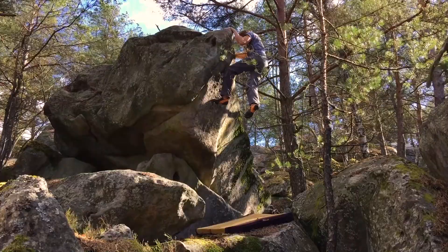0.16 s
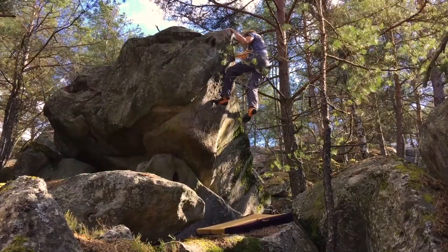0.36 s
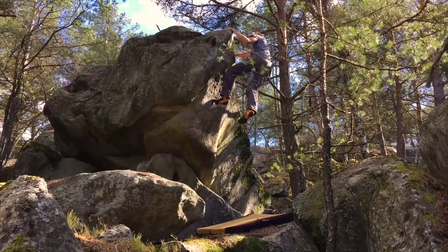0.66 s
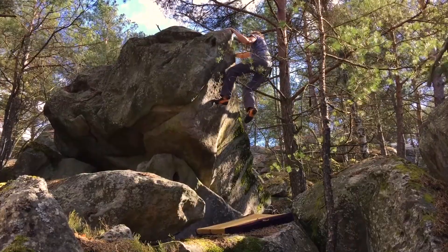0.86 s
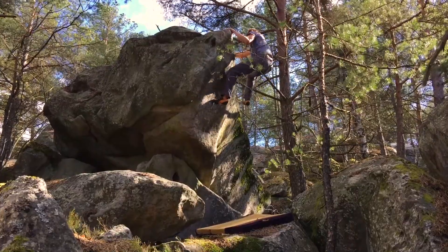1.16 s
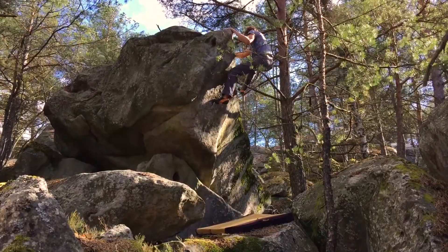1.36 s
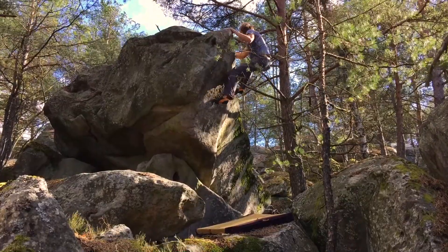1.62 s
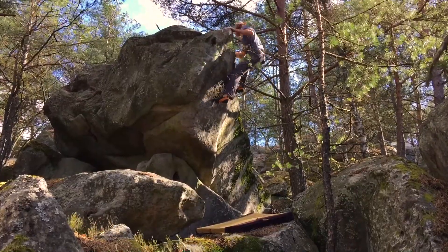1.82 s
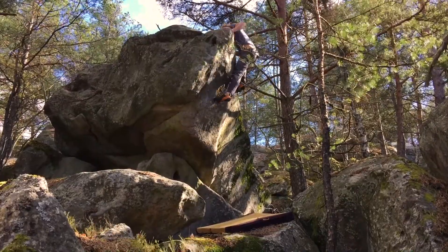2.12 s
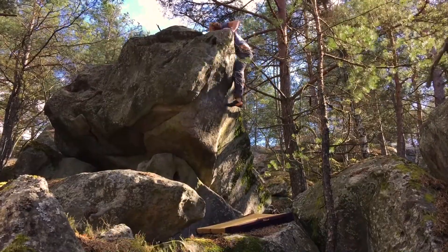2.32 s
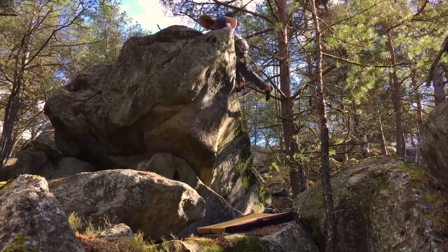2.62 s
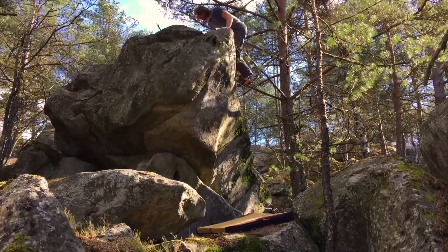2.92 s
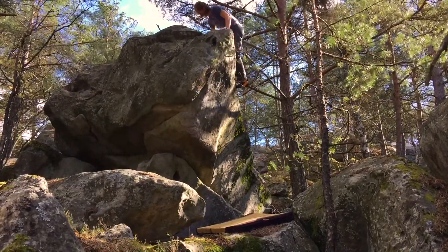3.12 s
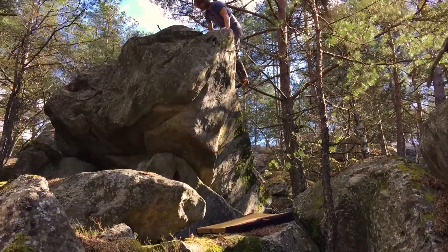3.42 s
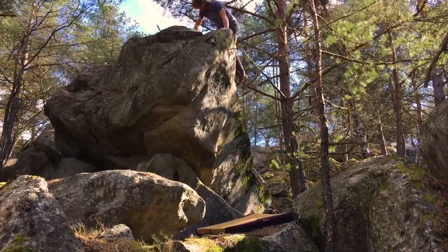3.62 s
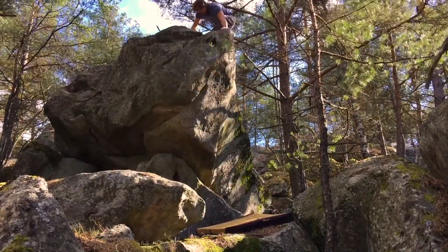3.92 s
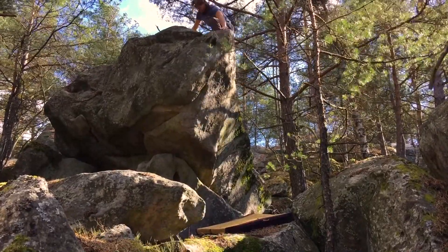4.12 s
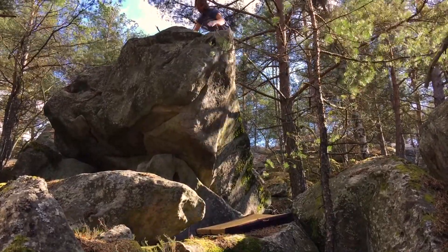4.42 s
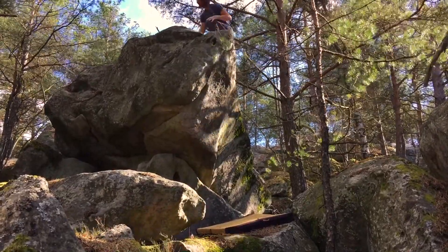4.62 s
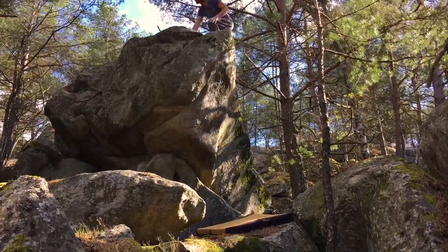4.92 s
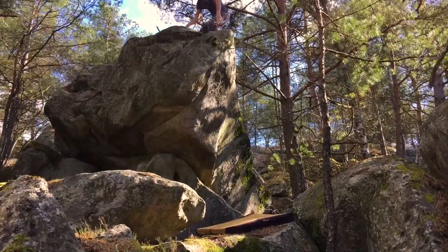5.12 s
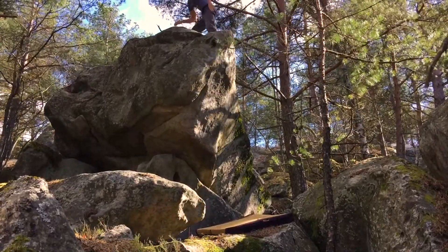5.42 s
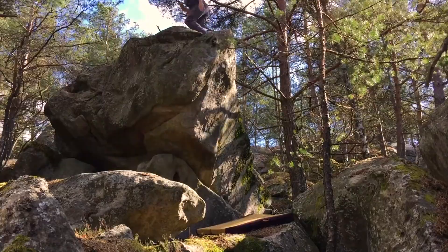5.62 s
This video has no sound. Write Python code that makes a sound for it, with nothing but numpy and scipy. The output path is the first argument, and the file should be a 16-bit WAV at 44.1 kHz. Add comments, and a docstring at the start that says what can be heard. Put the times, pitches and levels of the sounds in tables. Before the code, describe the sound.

Wind buffets a bare microphone in a pine forest, making low, fluttering rumbles in quick irregular gusts. The gusts start lighter, then grow stronger after about two seconds, with the hardest landing as short, dull thumps. Behind them, wind rushes softly and steadily through the treetops. A few very faint dry ticks and scuffs come from a climber on a boulder some metres away.

```python
"""Gusts buffet a bare microphone in a pine wood, while the wind rushes steadily through the crowns.
The buffeting is a swarm of eddies, each a short pressure kick whose swings lengthen;
the strongest land as single slaps. Faint dry ticks, scuffs and rustles come from a climber
on a boulder some metres off. There is one thin high peep, perhaps a distant bird."""
import sys
import numpy as np
from scipy import signal
from scipy.fft import rfft, irfft
from scipy.io import wavfile
from scipy.ndimage import uniform_filter1d

SR = 44100
rng = np.random.default_rng(int(sys.argv[2]) if len(sys.argv) > 2 else 0)


def to_wav(s):
    """Save 16-bit WAV."""
    ch = np.atleast_2d(s).T  # columns
    pcm = np.round(np.clip(ch, -1, 1) * 32767)  # PCM
    wavfile.write(sys.argv[1], SR, pcm.astype(np.int16))


N = 254016
TIME_S = np.arange(N) / SR


def undb(db):
    """Decibels to gain."""
    return 10 ** (np.asarray(db) / 20)


def unit_rms(x):
    """Scale to rms 1."""
    return x / np.sqrt(np.mean(x ** 2))


def add(out, start_s, sound):
    """Mix a sound in at start_s."""
    start = int(np.clip(start_s * SR, 0, N - 1))
    out[start:start + len(sound)] += sound[:N - start]


def colour(x, outline):
    """Filter by a (freq_hz, gain_db) outline."""
    freq_hz, gain_db = np.transpose(outline)
    bins_hz = np.maximum(np.fft.rfftfreq(2 * N, 1 / SR), 1)
    gain = undb(np.interp(np.log(bins_hz), np.log(freq_hz), gain_db))
    return irfft(rfft(x, 2 * N) * gain)[:N]


def wander(rate_hz):
    """Random steps at rate_hz, smoothed twice; rms 1."""
    hold = int(SR / rate_hz)
    steps = np.repeat(rng.standard_normal(N // hold + 1), hold)[:N]
    return unit_rms(uniform_filter1d(uniform_filter1d(steps, hold), hold))


def eddy(pitch_hz, phase_turns, cycles, spread):
    """One pressure kick and its crest delay: a quick front, then ever longer swings as the wake passes."""
    crest_s = cycles / pitch_hz
    length = int(crest_s * np.exp(3 * spread) * SR)
    log_age = np.log(np.arange(1, length) / SR / crest_s)
    envelope = np.exp(-.5 * (log_age / spread) ** 2)
    return envelope * np.cos(2 * np.pi * (cycles * log_age + phase_turns)), crest_s


# Microphone port response: freq_hz, gain_db
PORT_RESPONSE = [(20, -31.5), (32, -15.5), (50, -1.5), (80, 0.5), (130, 1), (190, -1), (240, 1), (360, -1),
                 (560, 3), (800, 1.5), (1200, 3.5), (2200, -2), (5000, -32)]


def mic_port(pressure):
    """The port colours the air pressure that hits it."""
    return colour(pressure, PORT_RESPONSE)


def eddy_swarm(strength, centre_hz, rate_per_s, range_oct, cycles, spread, scatter_db, window_s):
    """Random eddies about a moving centre pitch; their rms over window_s follows the wind's strength."""
    pressure = np.zeros(N)
    for when, phase_turns, detune, weakness in rng.random((int(rate_per_s * N / SR), 4)):
        at = int(when * N)
        pitch_hz = centre_hz[at] * 2 ** (range_oct * (2 * detune - 1))
        kick, crest_s = eddy(pitch_hz, phase_turns, cycles, spread)
        add(pressure, at / SR - crest_s, kick * undb(-scatter_db * weakness))
    swarm = mic_port(pressure)
    window = int(window_s * SR)
    power = uniform_filter1d(uniform_filter1d(swarm ** 2, window), window) + 1e-9
    return swarm / np.sqrt(power) * strength


def gust_power(start_s, length_s, level_db, release_s, attack_s=.008):
    """A gust rises quickly, holds and dies away."""
    rise = np.clip((TIME_S - start_s) / attack_s + 1, 0, 1)
    fall = np.exp(-np.clip((TIME_S - start_s - length_s) / release_s, 0, 20))
    return (undb(level_db) * rise * fall) ** 2


# Light breeze between gusts, with one short calm: time_s, large_eddy_db
BREEZE_LEVELS = [(0, -45), (.2, -38.5), (.85, -45), (2.5, -40), (5.0, -42.5), (5.11, -57.5), (5.2, -37.5),
                 (5.76, -44)]
# Gusts at the microphone: start_s, length_s, large_eddy_db, small_eddy_db, small_eddy_hz
MIC_GUSTS = [(0.056, 0.022, -35.5, -40, 167), (0.284, 0.027, -39.5, -34, 277),
             (0.363, 0.085, -36.0, -39, 250), (0.478, 0.03, -33, -48, 300), (0.578, 0.085, -34, -34, 228),
             (0.679, 0.045, -38, -37, 215), (0.789, 0.025, -41, -44, 270), (0.877, 0.031, -36, -43, 174),
             (0.948, 0.03, -31.5, -39, 220), (0.998, 0.092, -34.5, -36.5, 237),
             (1.131, 0.042, -37.5, -36, 270), (1.222, 0.052, -33.5, -37, 192),
             (1.293, 0.046, -34, -41.5, 280), (1.369, 0.04, -30.5, -40, 280), (1.505, 0.035, -34, -44, 190),
             (1.563, 0.067, -35.5, -37, 167.6), (1.708, 0.057, -34, -39, 218),
             (1.808, 0.068, -35, -39.5, 282), (1.917, 0.028, -40, -34.5, 250),
             (1.992, 0.12, -37, -42.5, 249), (2.06, 0.022, -30.5, -32, 167),
             (2.139, 0.11, -29.5, -40.5, 216), (2.243, 0.115, -30.5, -33, 235),
             (2.362, 0.016, -33, -32.5, 520), (2.381, 0.03, -30, -45, 300), (2.548, 0.05, -28.5, -35, 190),
             (2.594, 0.055, -33.5, -35, 280), (2.656, 0.105, -26.5, -35, 200),
             (2.776, 0.038, -33, -45.5, 380), (2.864, 0.03, -31, -30.5, 323), (2.913, 0.03, -31, -47, 167),
             (2.968, 0.014, -33, -29.5, 260), (3.024, 0.02, -43, -33, 198),
             (3.066, 0.066, -23.5, -33.5, 309), (3.169, 0.018, -31, -31, 328),
             (3.199, 0.028, -28.5, -34, 193), (3.307, 0.051, -30, -37, 218),
             (3.381, 0.055, -28, -30.5, 290), (3.465, 0.088, -36, -32, 257),
             (3.643, 0.057, -31.5, -35, 357), (3.727, 0.07, -30, -30.5, 231), (3.77, 0.11, -34, -36, 311),
             (3.895, 0.059, -37.5, -41, 216), (3.97, 0.092, -33, -36.5, 225),
             (4.083, 0.031, -45.5, -36.5, 192), (4.185, 0.04, -29.5, -41, 215),
             (4.219, 0.065, -33.5, -37.5, 193), (4.343, 0.037, -45, -32.5, 215),
             (4.364, 0.035, -33.5, -34.5, 413), (4.467, 0.06, -34, -45.5, 311),
             (4.546, 0.061, -25.0, -30.5, 275), (4.618, 0.055, -31.5, -30.5, 350),
             (4.696, 0.032, -33.5, -39.5, 285), (4.862, 0.072, -29, -34.5, 296),
             (4.926, 0.045, -32.5, -44, 477), (5.005, 0.047, -36.5, -31.5, 266),
             (5.16, 0.024, -28.5, -36, 250), (5.197, 0.051, -29.5, -39.5, 222),
             (5.263, 0.11, -36.5, -43, 171), (5.392, 0.032, -39, -43, 172), (5.47, 0.032, -29.5, -34, 171),
             (5.538, 0.031, -35, -45.5, 247), (5.667, 0.086, -36.5, -39, 210)]


def buffeting(breeze_small_db=-12.5, breeze_small_hz=247, pitch_exponent=.12, puff_db=2.5):
    """Large eddies rumble, higher in stronger wind; small ones flutter and die sooner. Both puff as one."""
    large_power = undb(np.interp(TIME_S, *np.transpose(BREEZE_LEVELS))) ** 2
    small_power = large_power * undb(breeze_small_db) ** 2
    weighted_pitch = small_power * breeze_small_hz
    for start_s, length_s, large_db, small_db, small_hz in MIC_GUSTS:
        large_power += gust_power(start_s, length_s, large_db, release_s=.011)
        small_gust = gust_power(start_s, length_s, small_db, release_s=.0055)
        small_power += small_gust
        weighted_pitch += small_gust * small_hz
    large_strength = np.sqrt(large_power)
    rumble_hz = 112 * np.clip(unit_rms(large_strength), .3, 2) ** pitch_exponent
    flutter_hz = weighted_pitch / small_power
    rumble = eddy_swarm(large_strength, rumble_hz, rate_per_s=140, range_oct=.89,
                        cycles=1.77, spread=.29, scatter_db=5, window_s=.016)
    flutter = eddy_swarm(np.sqrt(small_power), flutter_hz, rate_per_s=240, range_oct=.57,
                         cycles=1.71, spread=.3, scatter_db=5.5, window_s=.03)
    puffs = undb(puff_db * wander(rate_hz=55))
    return (rumble * undb(.78) + flutter * undb(-.5)) * puffs


# Spectrum of the rush in the crowns: freq_hz, relative_db
RUSH_SPECTRUM = [(40, -6.5), (150, 3), (350, -9.5), (550, 0.5), (780, -2), (980, 0), (1400, -4),
                 (2000, -7.5), (3000, -17.5), (4800, -32), (6000, -33), (8000, -37.5), (11000, -40.5),
                 (15500, -40.5)]
# Slow swell of its hiss: time_s, gain_db
RUSH_SWELL = [(0, 1.8), (.75, 0.4), (1.0, 1.2), (1.9, .6), (2.4, -1.2), (2.95, -0.1), (3.4, -0.3),
              (3.9, -0.5), (4.15, 0), (4.7, -.3), (4.95, 1), (5.45, -.9), (5.76, 0)]
# How far each band follows the swell: freq_hz, share
RUSH_SWELL_SHARE = [(500, 0.11), (1800, 1), (3800, 0.92), (6000, 0)]


def pine_rush(level_db=-48, waver_db=.9):
    """Steady hiss of wind in the pines, swelling slowly, with a slight random waver added per band."""
    edges_hz = np.geomspace(30, 20000, 31)
    bins_hz = np.fft.rfftfreq(N, 1 / SR)
    noise_spectrum = rfft(rng.standard_normal(N))
    swell_db = np.interp(TIME_S, *np.transpose(RUSH_SWELL))
    rush = np.zeros(N)
    for low_hz, high_hz in zip(edges_hz, edges_hz[1:]):
        band = irfft(noise_spectrum * ((bins_hz >= low_hz) & (bins_hz < high_hz)), N)
        share = np.interp(low_hz, *np.transpose(RUSH_SWELL_SHARE))
        rush += band * undb(share * swell_db + waver_db * wander(rate_hz=20))
    return unit_rms(colour(rush, RUSH_SPECTRUM)) * undb(level_db)


# Strongest eddies, ahead of the port: time_s, kick_db, pitch_hz, wake_db, forerunner_re_kick_db
STRONG_EDDIES = [(0.304, -28, 152.5, -16.5, -20), (0.357, -26, 248, -33.5, -10),
                 (0.372, -24, 219, -24.5, -7.5), (0.486, -23.5, 334, -24.5, -15),
                 (0.593, -24.5, 278, -22.5, -5.5), (0.62, -24, 166.5, -14.5, -21),
                 (0.687, -25, 280, -32.5, -5), (0.797, -32, 290, -31, -9), (0.97, -27, 229, -28, -8),
                 (1.174, -34, 380, -35, -8), (1.217, -20, 190, -34, -10), (1.242, -22.5, 187, -22.5, -4.5),
                 (1.304, -27, 260, -21.5, -3), (1.343, -19.5, 220, -23.5, -7.5),
                 (1.373, -26.5, 392, -33, -15), (1.382, -33, 422, -31.5, -4),
                 (1.41, -22.5, 268, -27.5, -15.5), (1.619, -26, 247, -23.5, -14),
                 (1.87, -22.5, 150, -30, -19), (1.972, -17, 260, -15.5, -18.5),
                 (2.007, -21.5, 215, -34, -9.5), (2.166, -16, 256, -24, -6.5), (2.202, -17.5, 275, -25, -5),
                 (2.377, -11, 365, -12, -15), (2.381, -11.5, 163, -16.5, -19), (2.5762, -20, 898, -14, -21),
                 (2.58, -9.5, 134.6, -11, -20.5), (2.63, -25, 249, -22, -8.5),
                 (2.672, -27.5, 580, -31, -14), (2.676, -15.5, 148, -18.5, -21),
                 (2.704, -26.5, 299, -17.5, -13.5), (2.718, -13, 287, -15, -17.5),
                 (2.776, -25, 440, -24, -8), (2.823, -19, 270, -29, -14), (2.867, -21.5, 199.5, -24, -14),
                 (2.878, -21.5, 229, -22.5, -4), (2.897, -19.5, 402, -15.5, -3.5),
                 (2.97, -23.5, 361, -25.5, -12), (3.054, -22.5, 282, -18.5, -12.5),
                 (3.065, -21, 396, -20.5, -5.5), (3.109, -24.5, 396, -25, -10),
                 (3.119, -19.5, 354, -18, -7), (3.167, -14.5, 288, -12, -16), (3.208, -24, 322, -23.5, -4),
                 (3.226, -22.5, 279, -26, -5.5), (3.367, -25.5, 394, -29, -20),
                 (3.405, -16.5, 171, -29.5, -20), (3.42, -19.5, 192, -24.5, -8),
                 (3.482, -25, 298, -26.5, -8), (3.515, -23, 343, -31.5, -9), (3.532, -22, 333, -23.5, -11),
                 (3.671, -24, 402, -32, -18), (3.674, -17.5, 127.2, -17, -20),
                 (3.747, -20, 319, -13.5, -4.5), (3.815, -15, 452, -11.5, -4.5),
                 (3.831, -22.5, 151.4, -17, -20), (3.847, -17, 429, -19.5, -19),
                 (3.894, -25.5, 266, -30, -13), (3.929, -23.5, 220, -32.5, -14),
                 (4.189, -15, 239, -14.5, -5), (4.368, -20.5, 222, -32.5, -6), (4.38, -23, 527, -30, -9),
                 (4.396, -24, 192, -20, -3.5), (4.582, -15, 316, -28, -15), (4.618, -22, 427, -20.5, -17),
                 (4.629, -12.5, 367, -24, -9.5), (4.632, -10.5, 248, -19.5, -12),
                 (4.655, -13.5, 524, -19, -20), (4.67, -16, 398, -31.5, -6.5),
                 (4.942, -14.5, 452, -16.5, -6.5), (4.951, -16.5, 180, -18.5, -4),
                 (5.238, -24.5, 229, -23.5, -10.5), (5.331, -23, 222, -20, -2), (5.384, -21, 438, -26, -21),
                 (5.391, -13.5, 309, -13, -14), (5.444, -28.5, 219, -33.5, -14),
                 (5.467, -23, 350, -19, -18), (5.606, -25, 126, -26.5, -21), (5.674, -20.5, 210, -39, -4),
                 (5.736, -23.5, 200, -30, -10.5)]


def slaps(mean_lead_s=.006016):
    """Strong eddies hit the port as ragged thumps: a small forerunner, the kick, then a slower wake."""
    pressure = np.zeros(N)
    for time_s, kick_db, pitch_hz, wake_db, forerunner_re_kick_db in STRONG_EDDIES:
        kick_turns, wake_turns, forerunner_turns, jitter = rng.random(4)
        lead_s = mean_lead_s * (.7 + .6 * jitter)
        forerunner, crest_s = eddy(min(pitch_hz * 1.2, 560), forerunner_turns, cycles=1.8, spread=.3)
        add(pressure, time_s - crest_s - lead_s, forerunner * undb(kick_db + forerunner_re_kick_db))
        kick, crest_s = eddy(pitch_hz, kick_turns, cycles=1.4, spread=.44)
        add(pressure, time_s - crest_s, kick * undb(kick_db))
        wake, _ = eddy(max(pitch_hz / 2.6, 72), wake_turns, cycles=1.2, spread=.4)
        add(pressure, time_s - crest_s, wake * undb(wake_db))
    return mic_port(pressure)


# Faint ticks, scuffs and one peep: start_s, level_db, centre_hz, half_width_ratio, hold_s, decay_s
SCUFFS_AND_PEEP = [(2.016, -76, 13500, .15, .005, .018), (2.017, -78, 6300, .3, .01, .03),
                   (2.08, -79, 12900, .17, .04, .02), (2.18, -75, 5340, .015, .025, .012),
                   (2.62, -73, 3700, .25, .09, .04), (2.67, -66, 13300, .1, .003, .007),
                   (2.682, -73, 8500, .65, .05, .045), (2.84, -74, 3700, 0.32, 0.11, .03),
                   (2.892, -69.5, 13600, .17, .003, .004), (2.915, -78, 8000, .5, .03, .015),
                   (3.043, -70.5, 9000, .65, .015, .012), (3.064, -73, 7000, .7, .042, .02),
                   (3.371, -67, 12800, .2, .005, .005), (3.818, -74.5, 13000, .2, .005, .012),
                   (4.33, -77, 13500, .2, .045, .025), (4.38, -76, 4300, .5, 0.13, .03),
                   (4.44, -75, 13300, .15, .003, .008), (4.937, -69, 9400, .07, .005, .005),
                   (5.25, -75, 12500, .1, .004, .006), (5.725, -76, 13300, .15, .003, .006)]


def scuffs_and_peep(grain_db=4, rise_s=.003):
    """Grainy noise bursts: faint ticks and scuffs; the narrowest is a thin peep, perhaps a far bird."""
    out = np.zeros(N)
    age_s = TIME_S[:SR // 2]
    for start_s, level_db, centre_hz, half_width, hold_s, decay_s in SCUFFS_AND_PEEP:
        grain = undb(grain_db * wander(rate_hz=600))[:len(age_s)]
        envelope = (1 - np.exp(-age_s / rise_s)) * np.exp(-np.maximum(age_s - hold_s, 0) / decay_s)
        edges_hz = [centre_hz / (1 + half_width), centre_hz * (1 + half_width)]
        bandpass = signal.butter(2, edges_hz, "band", fs=SR, output="sos")
        burst = signal.sosfilt(bandpass, grain * envelope * rng.standard_normal(len(age_s)))
        add(out, start_s, unit_rms(burst) / unit_rms(envelope).max() * undb(level_db))
    return out


def scene():
    """Wind on the microphone in front of the wood; mono."""
    return (buffeting() + slaps() + pine_rush() + scuffs_and_peep())[None]


def record(dry, cutoff_hz=15700):
    """The recorder cuts the top treble steeply."""
    return signal.sosfilt(signal.ellip(10, .1, 80, cutoff_hz, fs=SR, output="sos"), dry)


dry = scene()
out = record(dry)
to_wav(out)
```